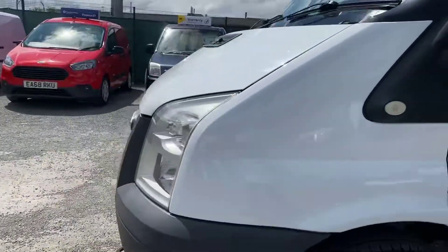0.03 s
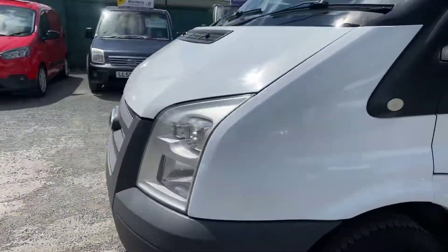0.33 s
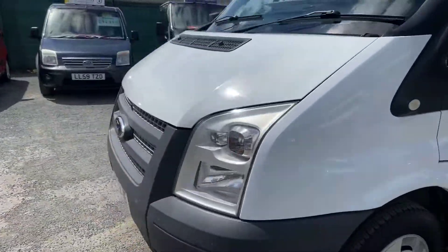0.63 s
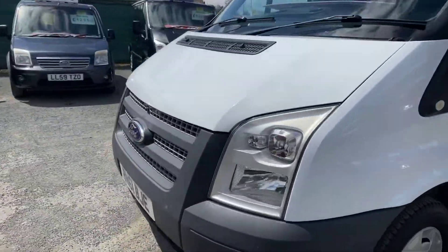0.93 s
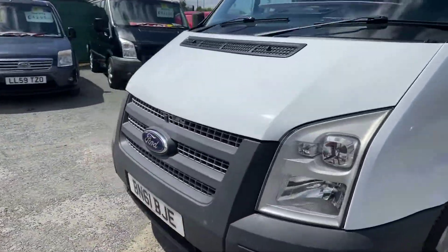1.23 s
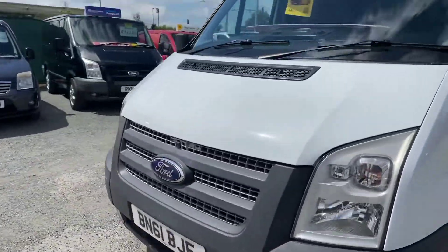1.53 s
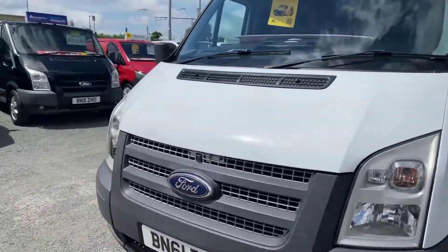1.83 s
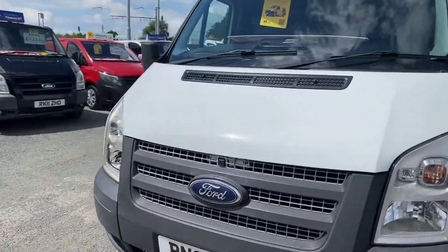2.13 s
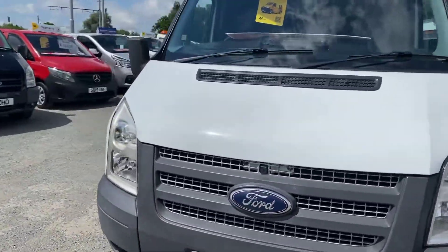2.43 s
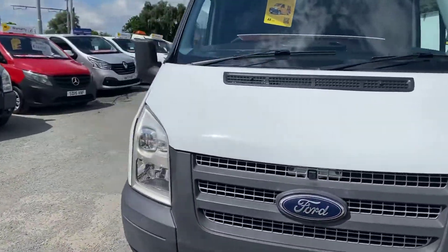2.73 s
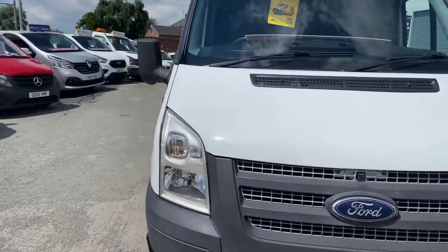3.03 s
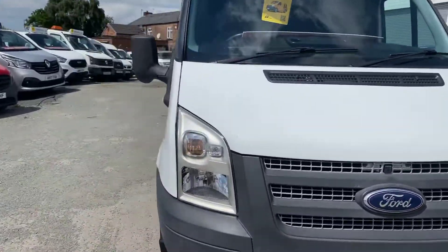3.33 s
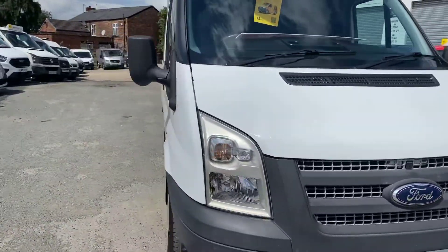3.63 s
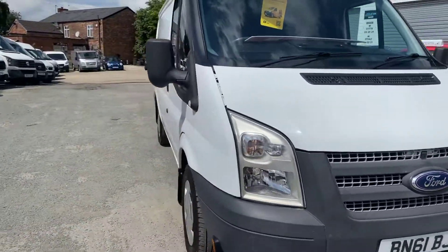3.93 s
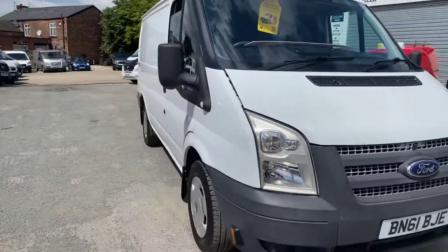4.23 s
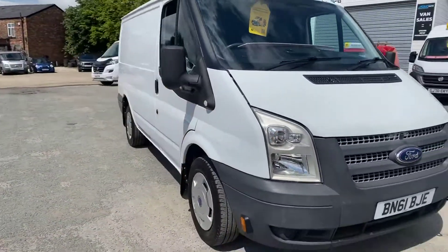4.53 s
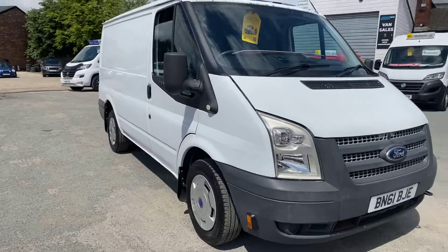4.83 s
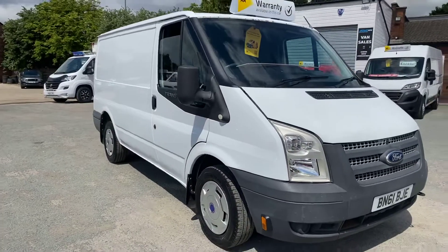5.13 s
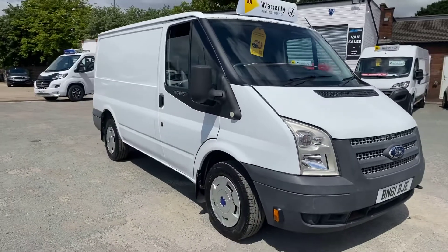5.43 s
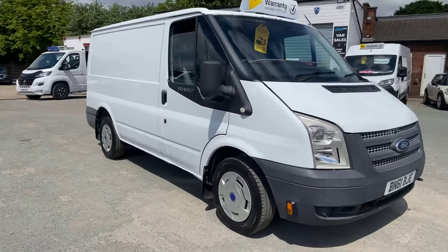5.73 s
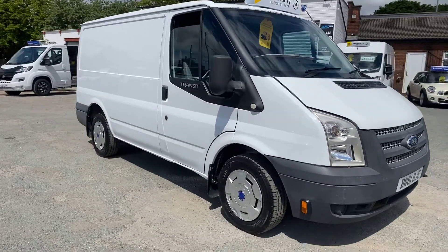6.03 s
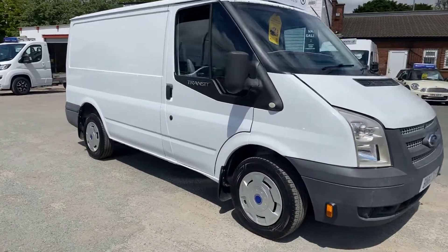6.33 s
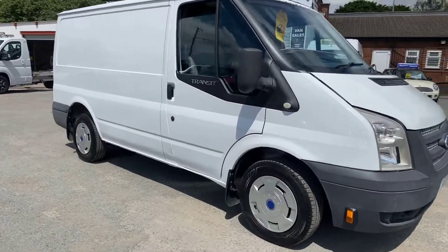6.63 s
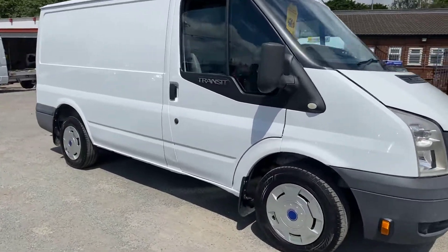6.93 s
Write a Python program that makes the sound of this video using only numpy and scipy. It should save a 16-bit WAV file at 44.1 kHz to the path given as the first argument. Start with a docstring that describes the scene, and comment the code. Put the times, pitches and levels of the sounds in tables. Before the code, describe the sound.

Close, unhurried footsteps scuff and crunch over grit in an open yard, with loose stones clicking under the shoes. A light breeze touches the handheld microphone at first; about halfway it begins to gust, and toward the end it buffets in heavy low rumbles while the steps continue. Behind it all are a soft wash of distant traffic, a faint engine idling and a barely audible machine whine.

```python
"""Footsteps on thin gravel: someone holding a phone walks slowly round a van parked in a yard.
Each step takes the weight, rolls and pushes off; stick-slip friction grinds the grit and a few loose
stones snap. Turbulent wind buffets the microphone, a light breeze at first, then strong gusts.
Distant traffic, an idling engine and a machine's whine lie underneath."""
import sys
import numpy as np
from scipy import signal
from scipy.fft import rfft, irfft, next_fast_len
from scipy.io import wavfile
from scipy.ndimage import uniform_filter1d, map_coordinates

SR = 44100
rng = np.random.default_rng(int(sys.argv[2]) if len(sys.argv) > 2 else 0)


def pcm_store(signal):
    """Save signal as 16-bit PCM."""
    levels = np.round(np.clip(np.atleast_2d(signal), -1, 1) * 32767)
    wavfile.write(sys.argv[1], SR, levels.astype(np.int16).T)


N = 317520
TOP_HZ = 15900  # the phone's band limit

# Steps: (touch time [s], rise to full weight [s], roll from there to lift [s], crunch level [dB],
# swell from touch [dB], toe push [dB], sand re crunch [dB], thud re crunch [dB])
FOOTFALLS = [(0.416, 0.021, 0.14, -46, 7, 8.5, -11.5, -0.5), (1.02, .048, .072, -42.5, 18, 7.5, -11.5, -4),
             (1.602, 0.074, .033, -41.5, 19, 6.5, -5, 2), (2.14, 0.096, 0.058, -46.5, 5.5, 3, -8.5, -9),
             (2.73, .012, 0.09, -42, 7.5, 2.5, -9.5, -9), (3.306, 0.035, 0.078, -45, 2, 8.5, -10, -11),
             (3.879, 0.052, 0.11, -51, 0, 8, -7, 0), (4.52, 0.099, 0.078, -46, 6.5, -2.5, -8.5, -0.5),
             (5.132, .125, .028, -37.5, 13.5, 3.5, -9.5, 2), (5.826, 0.011, 0.15, -44, -1, 3, -14.5, -1),
             (6.42, 0.14, 0.049, -33, 21.5, 3, -12, -6.5), (7.066, 0.0094, .012, -34, 7, 3.5, -17, 2.5),
             (7.088, .012, 0.12, -50, 2, 0, -14.5, -3)]


def amp(db):
    """Decibels to amplitude ratio."""
    return 10 ** (np.asarray(db) / 20)


def unit(x):
    """Normalisation to rms 1."""
    return x / np.sqrt(np.mean(x ** 2) + 1e-20)


def curves(rows):
    """Linear interpolation: one value per sample for each column after the time."""
    times, *columns = np.transpose(rows)
    return [np.interp(np.arange(N) / SR, times, column) for column in columns]


def wobble(rate):
    """Smooth random modulation: a spline through `rate` Gaussian values a second."""
    knots = rng.standard_normal(int(N * rate / SR) + 4)
    return map_coordinates(knots, [np.arange(N) * rate / SR])


def coloured(x, spectrum):
    """Minimum-phase filtering by a curve of (frequency [Hz], gain [dB]) on a log frequency axis."""
    size = 2 * next_fast_len(N // 2 + SR // 4)
    hz, db = np.transpose(spectrum)
    gain_db = np.interp(np.log(np.fft.rfftfreq(size, 1 / SR) + 1), np.log(hz + 1), db)
    cepstrum = irfft(np.log(amp(gain_db) + 1e-6))
    cepstrum[1:size // 2] *= 2  # folding the cepstrum makes the filter causal
    cepstrum[size // 2 + 1:] = 0
    return irfft(rfft(x, size) * np.exp(rfft(cepstrum)), size)[:N]


def band(x, edge_hz, kind, order):
    """Maximally flat low-pass or high-pass filtering."""
    return signal.sosfilt(signal.butter(order, edge_hz, kind, fs=SR, output="sos"), x)


def rush(spectrum):
    """Spectrally shaped Gaussian noise of rms 1."""
    return unit(coloured(rng.standard_normal(N), spectrum))


def steady(x, seconds):
    """Division by the running rms: slow swells even out, quick spikes remain."""
    size = int(seconds * SR)
    power = uniform_filter1d(uniform_filter1d(x ** 2, size), size)
    return x / np.sqrt(np.abs(power) + 1e-12)


def tones(partials, waver_db, drift_rad, drift_rate):
    """Sinusoids under random amplitude and phase modulation."""
    t = np.arange(N) / SR
    out = np.zeros(N)
    for hz, db in partials:
        gain = amp(db + waver_db * wobble(3.05))
        out += gain * np.sin(2 * np.pi * hz * t + drift_rad * wobble(drift_rate))
    return out


def traffic(roar_gain_db=5, hiss_gain_db=1.5):
    """Distant traffic sums incoherently to broadband noise: a low roar with a far hiss above it."""
    # Slow swells, before the gains: (time [s], roar level [dB], hiss level [dB])
    swells = [(0.0, -54, -62.5), (1.46, -54, -64.5), (2.55, -56, -66), (3.23, -54, -61.5),
              (3.71, -54.5, -66.5), (4.69, -53, -63.5), (6.42, -50, -61), (7.02, -53, -62),
              (7.2, -49.5, -59)]
    # Spectra of roar and hiss: (frequency [Hz], relative density [dB])
    roar_spectrum = [(71, -6), (120, 0.5), (206, -19.5), (232, -18.5), (292, -13.5), (588, -12.5),
                     (655, -14.5), (881, -11), (1270, -15), (1750, -19), (3000, -18.5), (3900, -74),
                     (6600, -120)]
    hiss_spectrum = [(1500, -15.5), (2400, 3), (2850, 0.5), (3100, 0), (3480, 0.5), (3750, -2.5),
                     (4400, -5), (5000, -6.5), (6000, -10.5), (6800, -16), (7500, -18.5), (9800, -30.5),
                     (12000, -27), (16000, -20)]
    roar_db, hiss_db = curves(swells)
    roar = unit(band(rush(roar_spectrum), 1944, "low", order=6))
    roar *= amp(roar_db + roar_gain_db + 0.33 * wobble(8.6))
    hiss = rush(hiss_spectrum) * amp(hiss_db + hiss_gain_db + 0.65 * wobble(3.0))
    return roar + hiss


def idling_engine(rumble_db=-48):
    """Two low partials beat against each other over a band of rumble."""
    # Rumble spectrum: (frequency [Hz], relative density [dB])
    rumble_spectrum = [(15, -46), (32, -22), (42, 7), (56, 10.5), (66, 3.5), (110, -6.5), (200, -34),
                       (500, -57)]
    # The engine's throbs: (frequency [Hz], level [dB])
    throbs = [(43, -47.5), (56, -47)]
    rumble = amp(rumble_db) * steady(rush(rumble_spectrum), 0.3)
    return rumble + tones(throbs, waver_db=3.0, drift_rad=1.8, drift_rate=2.5)


def machine_whine(hiss_db=-77):
    """A distant machine's wavering partials and hiss dip in the acoustic shadow of the van."""
    # Line spectrum: (frequency [Hz], level before the shadow gain [dB])
    partials = [(866.7, -67.5), (1157, -70.5), (1733, -68), (2019, -70.5), (2164, -72), (2336, -76),
                (2600, -73), (2891, -78), (3467, -75)]
    # Hiss spectrum: (frequency [Hz], relative density [dB])
    hiss_spectrum = [(4500, -33.5), (6000, -7), (6800, -4.5), (7600, -12.5), (9500, -37)]
    # How much reaches round the van: (time [s], gain [dB])
    shadow = [(0, 5), (2, 5), (2.8, -8), (7.2, 0.5)]
    whine = tones(partials, waver_db=2, drift_rad=0.85, drift_rate=18)
    hiss = amp(hiss_db) * rush(hiss_spectrum)
    return amp(curves(shadow)[0]) * (whine + hiss)


def gusting(attack_s=0.018, release_s=0.013, sag_db=4):
    """Gusts and breeze add in power, giving the envelopes of buffet, flutter and its upper edge."""
    # The breeze: (time [s], buffet level [dB], flutter level [dB])
    breeze = [(0, -54, -53.5), (2.9, -51.5, -56), (3.6, -46, -57.5), (4.8, -43.5, -47), (5.3, -31, -36.5),
              (5.55, -32, -48.5), (6.4, -36, -48), (7.2, -31, -35)]
    # Gusts: (start [s], length [s], buffet level [dB], flutter re buffet [dB], edge re flutter [dB])
    gusts = [(0.684, 0.037, -37.5, -30, 0), (2.805, 0.038, -41, -18, 2), (3.207, 0.062, -34.5, -6, -8),
             (3.305, .11, -36, -12.5, 7), (3.652, 0.026, -35.5, -23, 5), (3.746, 0.14, -35, -16.5, -4),
             (4.105, 0.13, -39, -8.5, 1), (4.558, 0.046, -33, -27, -6), (4.714, 0.041, -32, -0.5, -14),
             (4.882, 0.14, -27, 1, 0), (5.036, .105, -17, -8, 1), (5.163, 0.122, -22, -6.5, -0.5),
             (5.315, .045, -24.5, -18, -8), (5.458, 0.018, -23.5, -5, -5), (5.561, 0.028, -30, -34, -1),
             (5.649, .05, -31.5, -0.5, -1.5), (5.715, .035, -23.5, -14, -10), (5.807, 0.11, -20, -4, 2),
             (5.998, 0.053, -23.5, -5, -2), (6.075, 0.034, -27, -8.5, -3), (6.198, 0.012, -25, -20, 3),
             (6.394, 0.11, -35, -20, -5), (6.557, 0.021, -25, -3, -10), (6.611, 0.19, -29, -8, -4.5),
             (6.841, 0.16, -25.5, -1, -6.5), (6.995, 0.13, -24.5, -10.5, -4)]
    power = amp(curves(breeze))[[0, 1, 1]] ** 2
    for start_s, length_s, db, flutter_db, edge_db in gusts:
        age = np.arange(N) / SR - start_s
        rise = np.clip(1 + age / attack_s, 0, 1)
        fall = np.exp(-np.clip(age - length_s, 0, 1) / release_s)
        buffet = amp(db) * rise * fall
        front_db = sag_db * (0.5 - np.clip(age / length_s, 0, 1))  # most ragged at its front
        flutter = buffet * amp(flutter_db + front_db)
        power += np.array([buffet, flutter, amp(edge_db) * flutter]) ** 2
    return np.sqrt(power)


def wind(port_hz=36, edge_hz=335):
    """Turbulent pressure: eddies push on the microphone port, and gusts break into a ragged flutter."""
    # Pressure spectra: (frequency [Hz], relative density [dB])
    buffet_spectrum = [(15, -44), (30, -13.5), (42, -2.5), (65, 4), (115, -1), (170, -14), (260, -27),
                       (600, -94.5)]
    flutter_spectrum = [(90, -16.5), (170, 1.5), (230, -2.5), (340, -9), (480, -16.5), (750, -29),
                        (1500, -53), (4000, -82)]
    buffet_gain, flutter_gain, edge_gain = gusting()
    eddies_db = 2.2 * wobble(45)
    buffet = steady(rush(buffet_spectrum) * amp(eddies_db), 0.032)
    flutter = steady(rush(flutter_spectrum) * amp(eddies_db + 4.2 * wobble(140)), 0.034)
    low = band(band(flutter, edge_hz, "low", order=2), edge_hz, "low", order=2)
    edge = band(band(flutter, edge_hz, "high", order=2), edge_hz, "high", order=2)
    pressure = buffet_gain * buffet + flutter_gain * low + edge_gain * edge
    return band(pressure, port_hz, "high", order=3)  # the port rejects the slowest swings


def weight_db(age, press_s, roll_s, swell_db, push_db, ease_db=7):
    """Contact load in a step: it swells to full weight, eases, and peaks again as the toe pushes off."""
    lift_s = press_s + roll_s
    toe = np.exp(-((age - lift_s + 0.0079) / 0.013) ** 2)  # just before the lift
    return np.interp(age, [0, press_s, lift_s], [-swell_db, 0, -ease_db]) + push_db * toe


def snap(pitch_hz, cycles, phase, size=1024):
    """Brittle fracture: a damped sinusoid of energy 1 whose decay constant is `cycles` periods."""
    periods = pitch_hz * np.arange(size) / SR
    envelope = (1 - np.exp(-periods / 0.29)) * np.exp(-periods / cycles)
    wave = envelope * np.sin(2 * np.pi * periods + phase)
    return wave / np.sqrt(np.sum(wave ** 2, axis=-1, keepdims=True) + 1e-20)


def grit(per_second, pitch_hz, octaves, cycles, spread_db, slips_db):
    """Shot noise of rms 1: grains break at random, many faint and few strong, louder during slips."""
    when, size, turn, pitch_a, pitch_b = rng.random((int(per_second * N / SR), 5)).T
    start = (when * N).astype(int)
    hz = np.minimum(pitch_hz * 2 ** (octaves * (pitch_a + pitch_b - 1)), TOP_HZ)
    gain = amp(spread_db * np.minimum(-np.log(1 - size), 3.5) + slips_db[start])
    grains = gain[:, None] * snap(hz[:, None], cycles, 2 * np.pi * turn[:, None], size=160)
    places = start[:, None] + np.arange(grains.shape[1])
    return steady(np.bincount(places.ravel(), grains.ravel(), N)[:N], 0.14)


def treading(touch_s=0.0065, lift_db_per_s=333, settle_db_per_s=197.5, sand_rise_db=3):
    """Load sets the envelopes of coarse grit, sand and thud; each decays exponentially after the lift."""
    coarse, fine, thud = np.zeros((3, N))
    for start_s, press_s, roll_s, db, swell_db, push_db, sand_db, thud_db in FOOTFALLS:
        age = np.arange(N) / SR - start_s
        lifted_s = np.maximum(age - press_s - roll_s, 0)
        contact = np.clip(1 + age / touch_s, 0, 1)
        load = contact * amp(db + weight_db(age, press_s, roll_s, swell_db, push_db))
        pressed = load * amp(-lift_db_per_s * lifted_s)
        coarse += pressed
        thud += amp(thud_db) * pressed
        # ground finer and finer, the grit brightens from touch to lift
        late_db = sand_rise_db * (np.clip(age / (press_s + roll_s), 0, 1) - 0.5)
        fine += load * amp(sand_db + late_db - settle_db_per_s * lifted_s)
    return coarse, fine, thud


def crunch(scrape_threshold_db=-35, dust_db=-5):
    """Stick-slip friction under the sole: coarse grit crackles, sand fizzes, the ground thuds."""
    # Thud of the sole on the ground: (frequency [Hz], relative density [dB])
    sole_spectrum = [(100, -15), (250, -12), (520, 1.5), (850, -2), (1300, -3.5), (2200, -38.5),
                     (5000, -64)]
    coarse, fine, thud = treading()
    slips = wobble(150)  # slips bunch the strong grains
    pebbles = grit(per_second=480, pitch_hz=2090, octaves=1.15, cycles=0.88, spread_db=5.5,
                   slips_db=3.7 * slips)
    sand = grit(per_second=900, pitch_hz=5530, octaves=0.8, cycles=0.42, spread_db=3,
                slips_db=0.66 * slips + 4.2 * wobble(90))
    dust = grit(per_second=600, pitch_hz=13000, octaves=0.5, cycles=1.2, spread_db=1,
                slips_db=1.5 * wobble(100))
    # under heavy pressure so many grains break at once that they merge into a scrape
    scrape = grit(per_second=2500, pitch_hz=1920, octaves=1.37, cycles=0.76, spread_db=5.5,
                  slips_db=slips)
    scrape_share = coarse / (coarse + amp(scrape_threshold_db))
    grinding = np.sqrt(1 - scrape_share) * pebbles + np.sqrt(scrape_share) * scrape
    rough_noise = rng.standard_normal(N) * amp(7.1 * wobble(200))
    ground = steady(coloured(rough_noise, sole_spectrum), 0.042)
    return coarse * grinding + fine * (sand + amp(dust_db) * dust) + thud * ground


def cracks(per_second=28, relative_db=-2.5, spread_db=1.5, pitch_hz=2380, cycles=1.1, tick_db=-22):
    """Fracture under load: rows for stones() at random times in each step, louder under more weight."""
    rows = []
    for step, draws in zip(FOOTFALLS, rng.random((len(FOOTFALLS), 20, 3))):
        start_s, press_s, roll_s, db, swell_db, push_db, _, _ = step
        contact_s = press_s + roll_s
        for when, size, pitch in draws[:round(per_second * contact_s)]:
            age = when * contact_s
            load_db = db + weight_db(age, press_s, roll_s, swell_db, push_db)
            crack_db = load_db + relative_db + spread_db * (2 * size - 1)
            rows.append((start_s + age, crack_db, pitch_hz * 2 ** (pitch - 0.5), cycles, tick_db))
    return rows


def stone(pitch_hz, cycles, knock_db, tick_db, chip_db, tick_gain_db=10.5, tick_t60=0.0043):
    """Impulsive excitation: a stone snaps in two modes, knocks, ticks, rebounds and sheds six chips."""
    phase = rng.uniform(0, 2 * np.pi, 3)
    body = snap(pitch_hz, 1.02 * cycles, phase[0])
    body += amp(-14.5) * snap(1.8 * pitch_hz, 1.2 * cycles, phase[1])
    knock = amp(knock_db) * snap(pitch_hz=800, cycles=0.34, phase=phase[2])
    t = np.arange(len(body)) / SR
    tick = band(rng.standard_normal(len(t)) * amp(-60 * t / tick_t60), 4700, "high", order=2)
    tick *= amp(tick_db + tick_gain_db) / np.linalg.norm(tick)
    lead = SR // 20  # room for chips before and after the snap
    hit = np.pad(body + knock + tick, lead)
    rebound = lead + int(0.0022 * rng.uniform(0.5, 1.5) * SR)  # the stone rocks and strikes again
    hit[rebound:rebound + len(t)] += amp(-7) * body
    for when, size, pitch, turn in rng.uniform(-1, 1, (6, 4)):
        start = lead + int(when * 0.013 * SR)
        chip = snap(pitch_hz * 2 ** (0.6 * pitch), cycles=0.8, phase=np.pi * turn)
        hit[start:start + len(t)] += amp(chip_db + 6.1 * size) * chip
    return hit


def stones(crushed_chip_db=-14, kicked_chip_db=-25):
    """Fracture and impact transients: stones crushed underfoot shed louder chips than kicked ones."""
    # Stones that stand out: (time [s], main mode's level over 6 ms [dB], pitch [Hz],
    # nominal decay [cycles], relative tick level before its gain [dB])
    loud_stones = [(0.4278, -36.5, 2490, .55, -31), (0.5546, -42.5, 4020, .45, -32),
                   (1.025, -43.5, 2020, 0.41, -29), (1.0615, -40, 1945, 0.56, -33),
                   (1.3399, -36, 2230, .7, -22.5), (1.4508, -38.5, 2880, 0.79, -16.5),
                   (1.54, -44, 1600, 0.18, -21.5), (1.615, -39.5, 1560, 0.17, -23),
                   (1.668, -29, 1120, 1.26, -20.5), (1.6852, -35, 1190, 1.4, -33),
                   (1.7082, -43, 2690, .35, -9.5), (2.073, -53, 3840, 1.8, -22),
                   (2.229, -34.5, 1760, 0.87, -35), (2.266, -52, 4900, 0.44, -10),
                   (2.337, -49.5, 2380, 6.7, -33), (2.4441, -47, 1590, 1.8, -26),
                   (2.5807, -53.5, 1900, 0.39, -2.5), (2.7419, -31.5, 1980, 0.51, -45),
                   (2.8057, -38.5, 1470, .45, -23), (3.0, -42, 1460, 0.74, -29),
                   (3.071, -45, 1000, 0.74, -25.5), (3.3171, -41, 2170, 0.353, -30),
                   (3.3655, -35, 1420, 0.96, -28), (4.0244, -51, 3220, 0.99, -28),
                   (4.6736, -42, 5300, 0.29, -18), (4.7591, -44.5, 1850, 0.26, -27.5),
                   (5.136, -42, 2900, 0.27, -13), (5.2561, -28, 1077, 1.2, -28.5),
                   (5.2833, -37.5, 2300, 0.18, -15), (5.5632, -37.5, 1225, 1.9, -42),
                   (5.799, -42.5, 2265, 0.59, -40), (5.84, -40.5, 900, 0.62, -23),
                   (5.931, -33, 1460, 0.36, -24.5), (5.9615, -39, 2560, .45, -35),
                   (6.0963, -42.5, 1740, 1.4, -19), (6.13, -42.5, 2210, 1.9, -20.5),
                   (6.4293, -41, 2275, .45, -11), (6.4462, -34, 1538, 1.6, -42),
                   (6.5424, -44.5, 2230, 1.35, -24.5), (7.008, -42.5, 1700, 0.34, -33),
                   (7.0688, -27.5, 1680, .45, -24), (7.0754, -36.5, 1877, 0.44, -20)]
    out = np.zeros(N + SR)
    level_scale = np.sqrt(0.006 * SR)  # energy 1 becomes rms 1 over 6 ms
    for time_s, db, pitch_hz, cycles, tick_db in loud_stones + cracks():
        underfoot = any(0 < time_s - touch < press + roll for touch, press, roll, *_ in FOOTFALLS)
        chip_db = crushed_chip_db if underfoot else kicked_chip_db
        knock_db = -9 * np.log2(pitch_hz / 1520) - 5.5 * cycles  # big, dead stones knock hardest
        hit = level_scale * amp(db) * stone(pitch_hz, cycles, knock_db, tick_db, chip_db)
        start = round(time_s * SR) - SR // 20
        out[start:start + len(hit)] += hit
    return out[:N]


def falling_grit(per_second=9, gain_db=-39, spread_db=3):
    """Faint impacts at random times: grit drops from the swinging shoe and ticks on the ground."""
    out = np.zeros(N + SR)
    for when, size, pitch, ring in rng.random((int(per_second * N / SR), 4)):
        click = stone(1100 * 2 ** (1.6 * pitch), 0.35 + ring, knock_db=-6, tick_db=-17, chip_db=-18)
        start = int(when * N)
        out[start:start + len(click)] += amp(gain_db + spread_db * (2 * size + 1)) * click
    return out[:N]


def yard(x, t60, wet_db):
    """Scattering from van and ground adds a short, weak reverberant tail."""
    t = np.arange(SR // 4) / SR
    scatter = band(rng.standard_normal(len(t)), 3600, "low", order=1)
    tail = scatter * amp(-60 * t / t60) * (t > 0.003)
    return x + amp(wet_db) * signal.fftconvolve(x, tail / np.linalg.norm(tail))[:N]


def scene():
    """Superposition at one microphone: steps in the yard, wind, and the town behind."""
    # The microphone's uneven treble on close sounds: (frequency [Hz], gain [dB])
    treble_response = [(3500, -1.5), (4800, -4), (6800, -3.5), (8200, -10), (10000, -18.5), (12500, -13.5),
                       (16000, -10)]
    feet = coloured(crunch() + stones() + falling_grit(), treble_response)
    steps = yard(feet, t60=0.085, wet_db=-18)
    return (steps + wind() + traffic() + idling_engine() + machine_whine())[None]


def record(dry):
    """Band limiting: the phone keeps nothing above TOP_HZ."""
    size = next_fast_len(N + SR // 2)
    passband = np.fft.rfftfreq(size, 1 / SR) < TOP_HZ
    return irfft(rfft(dry, size) * passband, size)[..., :N]


dry = scene()
out = record(dry)
pcm_store(out)
```